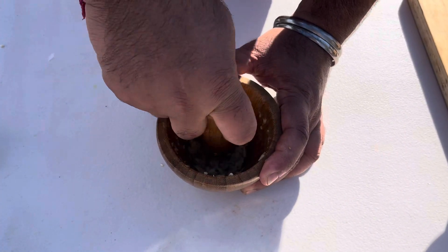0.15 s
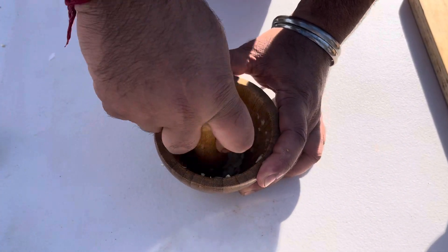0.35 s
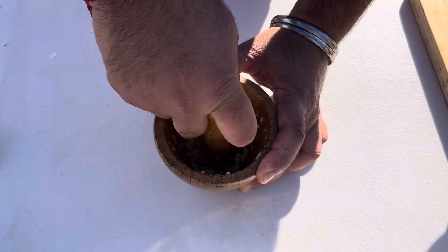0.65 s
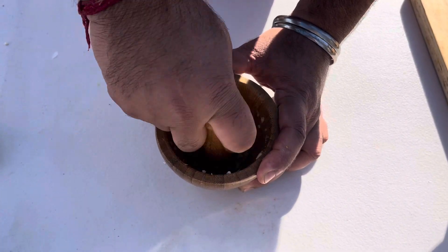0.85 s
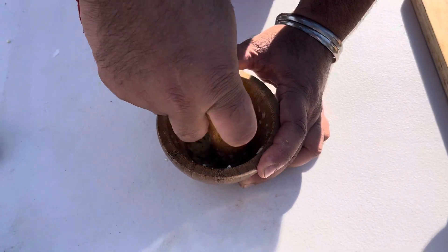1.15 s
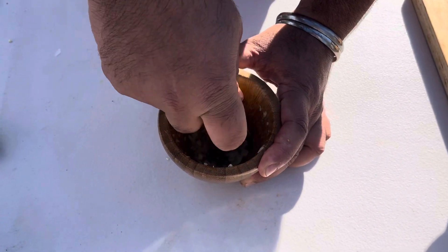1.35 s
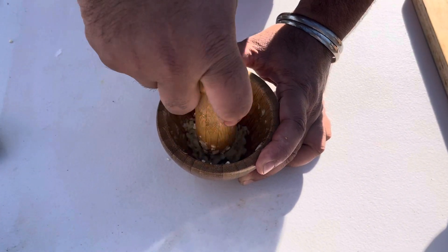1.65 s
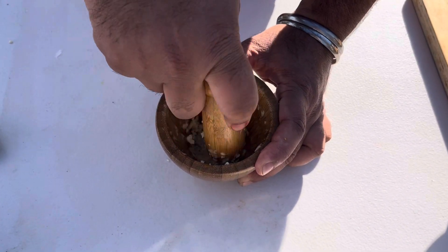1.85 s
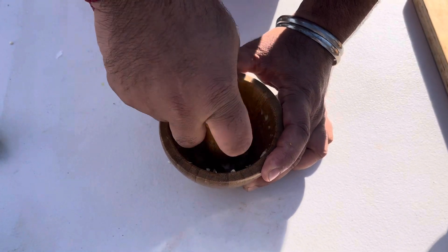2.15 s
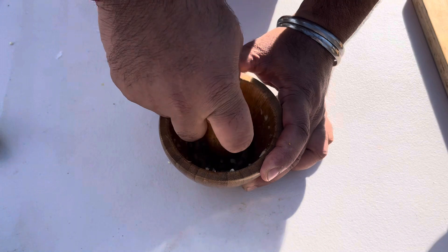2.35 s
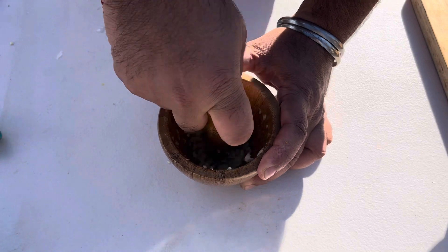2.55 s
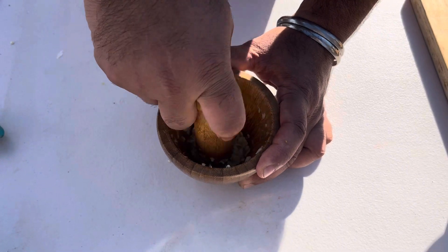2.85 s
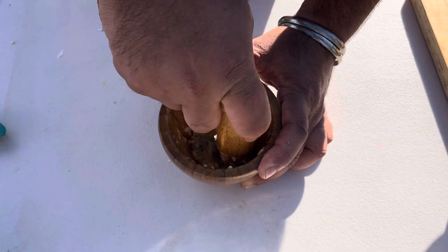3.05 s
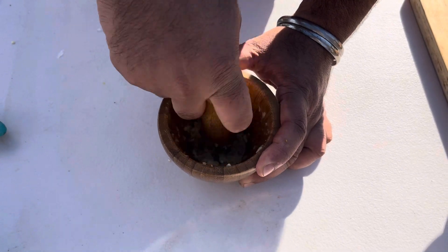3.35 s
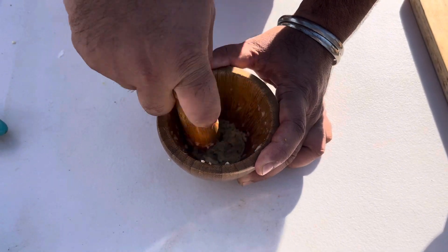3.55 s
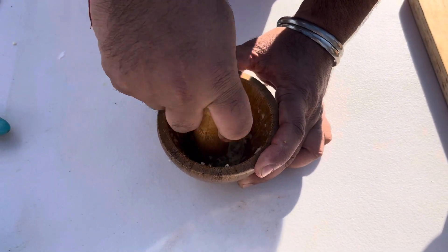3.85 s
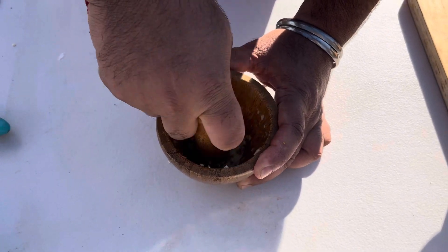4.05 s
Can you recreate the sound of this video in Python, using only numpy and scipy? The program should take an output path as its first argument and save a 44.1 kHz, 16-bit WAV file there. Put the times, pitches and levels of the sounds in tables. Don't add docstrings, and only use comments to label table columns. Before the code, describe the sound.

Close, regular pestle strokes thump and crunch in a wooden bowl, shaking the table top, with light rim knocks and faint bangle clinks.

```python
import sys
import numpy as np
from scipy import signal
from scipy.fft import rfft, irfft, next_fast_len
from scipy.io import wavfile
from scipy.ndimage import uniform_filter1d

SR = 44100
rng = np.random.default_rng(int(sys.argv[2]) if len(sys.argv) > 2 else 0)


def transcribe(signal):
    frames = np.atleast_2d(signal).T
    limited = np.clip(frames, -1, 1)
    pcm = np.round(limited * 32767).astype(np.int16)
    wavfile.write(sys.argv[1], SR, pcm)


def linear_from_db(decibels):
    return 10 ** (np.asarray(decibels, float) / 20)


N = 185423
WIDE = next_fast_len(N)
BINS = np.fft.rfftfreq(WIDE, 1 / SR)


def evened(x):
    return x / np.sqrt(np.mean(x ** 2) + 1e-20)


def read(points, hz):
    f, value = np.transpose(points)
    return np.interp(np.log(hz + 1), np.log(f + 1), value)


def add(mix, s, sound):
    part = mix[max(round(s * SR), 0):][:len(sound)]
    part += sound[:len(part)]


def filtered(x, gain):
    return irfft(rfft(x, WIDE) * gain, WIDE)[..., :N]


def colour(x, points):
    return evened(filtered(x, linear_from_db(read(points, BINS))))


def band(x, lo_hz, hi_hz):
    sos = signal.butter(2, [lo_hz, min(hi_hz, 20000)], "band", fs=SR, output="sos")
    return signal.sosfilt(sos, x)


def resonate(x, hz, width):
    r = np.exp(-np.pi * width / SR)
    return 2 * signal.lfilter([1 - r], [1, -r * np.exp(2j * np.pi * hz / SR)], x).real


def wander(x, hz, width):
    turn = np.exp(2j * np.pi * np.cumsum(hz) / SR)
    r = np.exp(-np.pi * width / SR)
    return 2 * (turn * signal.lfilter([1 - r], [1, -r], x / turn + 1e-18)).real


def patchy(x, patch_db, size=11):
    z = signal.stft(x, nperseg=128, noverlap=96)[2]
    patches = uniform_filter1d(rng.standard_normal(z.shape[::-1]), size, axis=0)
    patches = uniform_filter1d(patches, 4, axis=1)
    return signal.istft(z * linear_from_db(patch_db * evened(patches).T), nperseg=128, noverlap=96)[1][:N]


# pitch_hz, density_db
AIR_COLOUR = [(30, 6.5), (60, 3.5), (150, -6), (280, -22), (600, -33), (1300, -33.5), (2200, -41.5),
              (8000, -48.5)]
# pitch_hz, level_db
AIR_APART = [(110, -8), (250, -4.5), (700, 1), (1700, 6), (3000, -5), (9600, -1), (10600, -25)]
# pitch_hz, level_db
FAR_MACHINE = (1270, -69)


def air():
    a, b = (colour(v, AIR_COLOUR) for v in rng.standard_normal((2, N)))
    apart = filtered(b, linear_from_db(read(AIR_APART, BINS)))
    hz, db = FAR_MACHINE
    tone = linear_from_db(db + 5.5) * np.sin(2 * np.pi * hz * np.arange(N) / SR)
    return linear_from_db(-34.5) * np.array([a + apart, a - apart]) + tone


# start_s, grind_db, table_db, pressed_s
STROKES = [(-0.07, -15, -23, 0.068), (0.1287, -24.5, -21.5, 0.13), (0.319, -33, -27.5, 0.11),
           (0.8857, -26, -25, 0.12), (1.0956, -24.5, -23, 0.0914), (1.3096, -27.5, -23, 0.1),
           (1.5207, -25, -23, 0.09), (1.7335, -27.5, -23.5, 0.11), (1.936, -23, -19, 0.11),
           (2.154, -21, -18.5, 0.1168), (2.36, -16.5, -18.5, 0.13), (2.569, -22, -18.5, 0.128),
           (2.7876, -23, -19.5, 0.154), (2.989, -16, -16.5, 0.078), (3.1883, -19.5, -20, 0.093),
           (3.3941, -22, -19, 0.18), (3.604, -30, -23.5, 0.075), (3.8084, -18.5, -17, 0.0757),
           (4.0154, -20, -16.5, 0.12)]


def strokes(column, pressed_db_per_s, lifted_db_per_s, left_db, settle_db_per_s):
    t, power = np.arange(N) / SR, 0
    for row in STROKES:
        age = t - row[0]
        lifted = np.maximum(age - row[3], 0)
        db = row[column] - pressed_db_per_s * age - lifted_db_per_s * lifted
        settle_db = left_db - settle_db_per_s * age
        both = linear_from_db(2 * np.minimum(db, 0)) + linear_from_db(2 * np.minimum(settle_db, 0))
        power = power + both * np.clip(age / 0.0014, 0, 1) ** 2
    return np.sqrt(power)


# pitch_hz, density_db
TOP_COLOUR = [(30, -35.5), (50, 0.5), (110, 1), (190, 2), (320, -5), (520, -20.5), (900, -17.5),
              (1500, -57.5)]
# pitch_hz, width_hz, level_db
PLANKS = [(105.4, 22, 4.5), (175, 43.7, -4.5), (261, 53, 0), (304.35, 4.4, -8), (402.7, 35, -4),
          (533.5, 24, -3.5), (643.6, 145.5, -6), (1057, 28, -10.5)]


def shake():
    jolts = colour(rng.standard_normal(N), TOP_COLOUR)
    modes = evened(sum(linear_from_db(db) * evened(resonate(jolts, hz, width)) for hz, width, db in PLANKS))
    level = strokes(column=2, pressed_db_per_s=139.5, lifted_db_per_s=100.5,
                    left_db=-46.0, settle_db_per_s=59.5)
    return level * (linear_from_db(-3.0) * jolts + linear_from_db(1.7) * modes)


# start_s, peak_db, brightness_db, t60_s
TOUCHES = [(0.112, -19.5, 2, 0.034), (0.3002, -23.5, 2.5, 0.035), (0.8657, -17, -2, 0.031),
           (1.072, -25, 0.5, 0.04), (1.286, -20, 0.5, 0.033), (1.4895, -24, -8, 0.0174),
           (1.5047, -20, 2, 0.0397), (1.7, -40, 3.5, 0.019), (1.7155, -19, 4, 0.022),
           (1.914, -17.5, -4.5, 0.0306), (2.125, -19, -1, 0.0375), (2.3407, -9.5, -0.5, 0.0178),
           (2.55, -17.5, -2, 0.042), (2.769, -17, 2.5, 0.0234), (2.9687, -16.5, 0.5, 0.0394),
           (3.168, -20.5, 2.5, 0.036), (3.375, -16.5, -0.5, 0.041), (3.571, -21, -3, 0.038),
           (3.5868, -21.5, 1, 0.021), (3.785, -20, -0.5, 0.0346), (3.9913, -23, -0.5, 0.048)]
# start_s, peak_db, brightness_db, t60_s
CRUSHES = [(0.1303, -11.5, -4.5, 0.024), (0.318, -14.5, -1, 0.032), (0.8854, -5, 0.5, 0.032),
           (1.092, -14.5, -2, 0.032), (1.308, -4, 2, 0.019), (1.5242, -7.5, -0.5, 0.023),
           (1.7345, -11, -6, 0.026), (1.935, -4.5, 1, 0.0476), (2.148, -2.5, 0, 0.02),
           (2.364, -8, -2.5, 0.02), (2.574, -1.5, -1, 0.026), (2.7888, -8.5, -2.5, 0.054),
           (2.9897, -1, 1.5, 0.016), (3.1878, -2.5, 0.5, 0.022), (3.3969, -3.5, -2, 0.025),
           (3.6064, -8, 1, 0.0201), (3.8045, -4.5, -2, 0.0233), (4.014, -3.5, 0, 0.031)]
# start_s, peak_db, brightness_db
REBOUNDS = [(0.152, -18, -2.5), (0.333, -16, -1.5), (0.919, -23, 7.5), (1.1145, -32, -7), (1.343, -23, 4),
            (1.5444, -39, -3), (1.765, -24, 1), (1.961, -10, -2.5), (2.186, -14.5, -0.5), (2.387, -13, -12),
            (2.6116, -28.5, 14), (2.8108, -11, 1), (3.02, -4.5, -1), (3.226, -28.5, 17), (3.4364, -39, 5.5),
            (3.6417, -33, 16), (3.835, -6, -2.5), (4.035, -10, -2)]
# start_s, peak_db, brightness_db, t60_s
TWISTS = [(0.192, -15.5, -1, 0.019), (0.9595, -24, -1, 0.0173), (0.976, -35.5, 10, 0.057),
          (1.1551, -15.5, 4, 0.021), (1.368, -18.5, -6.5, 0.056), (1.382, -22.5, 6, 0.032),
          (1.407, -26, 8.5, 0.034), (1.5911, -19.5, 1, 0.0403), (1.7975, -12, 0, 0.0247),
          (2.018, -24, 5, 0.0814), (2.209, -11.5, 3, 0.038), (2.218, -15, -1, 0.0244),
          (2.238, -26, 8, 0.03), (2.262, -37.5, 9, 0.0503), (2.351, -20.5, -4, 0.037),
          (2.404, -14, 0.5, 0.0434), (2.4234, -16.5, 4, 0.03), (2.4973, -32, 8, 0.0313),
          (2.633, -22, 4.5, 0.093), (2.6644, -18, 6, 0.047), (2.865, -19.5, 10.5, 0.021),
          (2.8788, -21, 4, 0.04), (3.047, -33.5, -5, 0.05), (3.064, -37.5, 4, 0.042),
          (3.438, -25.5, 15, 0.0144), (3.459, -15, -3.5, 0.054), (3.496, -21.5, 4.5, 0.021),
          (3.507, -24, 5.5, 0.058), (3.595, -30, -5.5, 0.018), (3.665, -24.5, 7.5, 0.0234),
          (3.689, -24, 4.5, 0.058), (3.887, -22, 8, 0.012), (3.9075, -27, 0.5, 0.023),
          (3.918, -27, 4.5, 0.038), (4.1092, -24.5, 8.5, 0.029)]
# start_s, peak_db, t60_s
CRUMBS = [(0.2785, -39.5, .07), (0.399, -44, .02), (0.4381, -37, 0.066), (0.4863, -41.5, 0.033),
          (0.505, -46, 0.067), (0.53, -39.5, 0.038), (0.595, -50, 0.031), (0.612, -51, .03),
          (0.6371, -38.5, 0.047), (0.65, -39.5, 0.042), (0.689, -46.5, 0.091), (0.743, -58.5, .03),
          (1.2094, -54, .07)]
# thud_db, wood_db, fizz_db
TOUCH_TONE = (-4.5, -15, 1.6)
CRUSH_TONE = (-4.5, -16.5, -2.5)
REBOUND_TONE = (-8.5, -35.5, -1.5)
TWIST_TONE = (-13, -11, -3.5)
CRUMB_TONE = (-18.5, -13, 0)
TOUCH_SPAN = (0.6, 1.9, 1.1, 0.55)


def bursts(abrupt):
    out, t = np.zeros((4, N)), np.arange(4000) / SR
    touch_rise_s, crush_rise_s, small_rise_s = 0.0038, 0.0024, 0.00069
    rebound_t60_s = 0.02824
    rows = [(*r, TOUCH_TONE, TOUCH_SPAN, touch_rise_s) for r in TOUCHES]
    rows += [(*r, CRUSH_TONE, 1, crush_rise_s) for r in CRUSHES]
    rows += [(*r, rebound_t60_s, REBOUND_TONE, 1, crush_rise_s) for r in REBOUNDS]
    rows += [(*r, TWIST_TONE, 1, small_rise_s) for r in TWISTS]
    rows += [(s, db, 0, t60, CRUMB_TONE, 1, small_rise_s) for s, db, t60 in CRUMBS]
    for s, db, bright_db, t60, (thud_db, wood_db, fizz_db), span, rise in rows:
        lengths = np.maximum(t60 * np.multiply(span, np.ones(4)), .005)[:, None]
        shapes = (1 - np.exp(-t / rise)) ** 2 * linear_from_db(-120 * (t / lengths) ** abrupt)
        extras = (0, thud_db - bright_db, wood_db - bright_db / 2, fizz_db + bright_db)
        for row, shape, extra_db in zip(out, shapes, extras):
            add(row, s - .001, linear_from_db(2 * (db + extra_db - 8.5)) * shape / shape.max())
    return out


# pitch_hz, density_db
GRIT = [(880, -79), (1500, -12), (2130, -1), (2840, 1.5), (3580, -2), (4200, -3.5), (4690, -2),
        (5500, -4.5), (6390, -7), (7800, 3), (11600, -11.5), (13800, -7), (16400, 7.5)]
# pitch_hz, width_hz, level_db
RATTLE = [(2879, 24, 2.5), (3905, 13, 4.5), (4204.6, 122, 2), (5430, 330, -2), (6975, 55, 2.5),
          (7630, 26.5, -11), (8070, 100, -2), (8870, 600, 2.5), (9620, 350, 3), (11580, 78, -5.5),
          (11320, 214, 0), (11640, 114, -1), (13330, 92, -1)]


def crunch(envelopes, grip):
    sizes = linear_from_db(2.536 * np.minimum(rng.exponential(1, N), 4))
    cracks = rng.standard_normal(N) * sizes * (rng.random(N) < 6000 / SR)
    grit = patchy(patchy(colour(cracks, GRIT), patch_db=3.0), patch_db=1.0, size=70)
    main, thud, wood, fizz, grind = envelopes
    mid = evened(band(grit, 2750, 7270)) * np.sqrt(main + linear_from_db(-3.5) * grind)
    top = evened(band(grit, 8900, 15040)) * np.sqrt(fizz + linear_from_db(1.0) * grind ** 1.141)
    low = evened(band(cracks, 775, 2354)) * np.sqrt(wood + linear_from_db(-17.0) * grind)
    dull = evened(band(cracks, 236, 1107.0)) * np.sqrt(thud)
    rung = 0
    for k, (hz, width, db) in enumerate(RATTLE):
        g = np.roll(grip, 9000 * k)
        rung = rung + linear_from_db(db + 5 * g[::-1]) * wander(mid + top, hz * (1 + .012 * g), width)
    return linear_from_db(-4.0) * (mid + top) + linear_from_db(-3.0) * rung + low + dull


def bends(rows, glide, rise, fall, late):
    out, u = np.zeros(N), np.arange(-1323, 2205) / SR
    for s, db, hz in rows:
        turns = hz * (np.sqrt(1 + 2 * glide * np.maximum(u, -.4 / glide)) - 1) / glide
        swell = np.exp(-((u - late) / np.where(u < late, rise, fall)) ** 2)
        add(out, s + u[0], -linear_from_db(db) * swell * np.cos(2 * np.pi * turns))
    return out


# start_s, depth_db, pitch_hz
PUSHES = [(0.1289, -10.5, 137.3), (0.3161, -11, 135.2), (0.8792, -2.5, 123), (1.0874, -17.5, 117),
          (1.3024, -8, 108), (1.5006, -14.5, 143), (1.716, -15, 138), (1.9312, -3, 123),
          (2.1418, -6.5, 108.4), (2.3549, -1, 133.2), (2.5666, -12, 127), (2.787, -12, 136),
          (2.9843, -1.5, 119), (3.1833, -8.5, 116), (3.3836, -16, 132.4), (3.5849, -16.5, 130.4),
          (3.8021, -7, 122.5), (4.0101, -8.5, 113)]
# start_s, depth_db, pitch_hz
SLAMS = [(0.1431, -4.5, 69.8), (0.3308, -5.5, 75), (0.8949, -4, 60), (1.1049, -8, 63.5), (1.3188, -4.5, 67),
         (1.536, -6.5, 77.4), (1.7474, -6.5, 69.8), (1.946, -3, 70.4), (2.1577, -6.5, 62),
         (2.3687, -5.5, 67.2), (2.5833, -3.5, 62), (2.8019, -3.5, 65), (2.9991, -7.5, 70.6),
         (3.1988, -4, 69.5), (3.4082, -4, 72.2), (3.6189, -9.5, 70.5), (3.8178, -3.5, 72.2),
         (4.0252, -4.5, 68.6)]
# start_s, depth_db, pitch_hz
SHUDDERS = [(2.398, -15, 167), (2.449, -15, 180.6), (3.042, -16.5, 156.6), (1.387, -25, 199),
            (1.407, -23, 207), (3.482, -18, 178.3), (2.35, -17, 331), (2.384, -20, 668.5),
            (2.395, -16, 334.6), (2.412, -20.5, 684), (2.432, -26, 673)]


def dips():
    pushes = bends(PUSHES, glide=51.1, rise=0.0098, fall=0.017, late=0.0032)
    stiffer = np.multiply(SLAMS, [1, 1, 1.15])
    slams = bends(stiffer, glide=1.1, rise=0.007, fall=0.0084, late=0.0014)
    shudders = bends(SHUDDERS, glide=3.2, rise=0.00734, fall=0.0094, late=0)
    return pushes + linear_from_db(4.0) * slams + shudders


def rings(rows, gain_db, tail):
    out, u = np.zeros(N), np.arange(-2205, 4410) / SR
    for (s, db, hz, half), phase in zip(rows, rng.random(len(rows))):
        swell = np.exp(-(u / np.where(u < 0, half, tail * half)) ** 2)
        note = np.sin(2 * np.pi * (hz * u + phase))
        neighbour = 0.63 * np.sin(2 * np.pi * (1.04 * hz * u + 3 * phase))
        add(out, s + u[0], linear_from_db(db + gain_db) * swell * (note + neighbour))
    return out


# start_s, level_db, pitch_hz, half_length_s
THUNKS = [(0.1509, -40.5, 1001, 0.0204), (0.3236, -24.5, 921, 0.0068), (0.8809, -43, 1012, 0.0099),
          (0.9027, -32.5, 735, 0.016), (1.0971, -26, 758, 0.0067), (1.5151, -18.5, 290.5, 0.011),
          (1.5267, -25, 799, 0.0068), (1.5325, -35, 1070, 0.0089), (1.7502, -25, 538.8, 0.017),
          (1.9432, -19, 1110, 0.0072), (1.949, -35, 672, 0.015), (2.2146, -29, 600.0, 0.013),
          (2.3467, -29, 1149, 0.009), (2.3757, -36, 1090, 0.024), (2.6616, -37, 586.5, 0.0117),
          (2.9025, -30, 524, 0.0092), (2.9954, -14, 1038, 0.0035), (3.0288, -40, 606, 0.028),
          (3.0723, -27, 997, 0.006), (3.2, -23, 600, 0.017), (3.2566, -41, 540, 0.026),
          (3.274, -32.5, 1016, 0.02), (3.3756, -25, 1010, 0.0037), (3.4017, -24, 560, 0.0056),
          (3.422, -37, 664, 0.031), (3.4598, -36, 834, 0.023), (3.483, -31, 980, 0.012),
          (3.6122, -25, 1093, 0.01), (3.8095, -19.5, 815, 0.0048), (4.0504, -40, 950, 0.0077)]


def thunks():
    return rings(THUNKS, gain_db=-2.5, tail=1.4)


# start_s, level_db, pitch_hz, half_length_s
PINGS = [(0.217, -39.5, 4120, 0.0054), (0.3352, -38.5, 12000, 0.0033), (0.372, -49, 3500, 0.004),
         (0.4, -48.5, 4340, 0.004), (0.415, -50.5, 4300, 0.0032), (0.612, -65, 4360, 0.004),
         (0.743, -66, 4150, 0.004), (1.1579, -31.5, 4100, 0.003), (1.1883, -43.5, 11650.0, 0.004),
         (1.311, -25, 5434, 0.00227), (1.312, -23.5, 2760, 0.00236), (1.3145, -15.5, 7890, 0.0028),
         (1.753, -32, 2880, 0.0047), (1.8019, -35.5, 8150, 0.0024), (1.8069, -48.5, 12120, 0.0099),
         (1.9501, -29.5, 7850, 0.0029), (1.989, -44, 11020.0, 0.0038), (2.1531, -22, 4190, 0.00452),
         (2.1541, -19.5, 7870, 0.00304), (2.1561, -29.5, 7160, 0.0028), (2.216, -37, 4127, 0.0096),
         (2.2224, -31, 8000, 0.0028), (2.3691, -20.5, 3894, 0.0022), (2.3721, -26, 5470, 0.0028),
         (2.3876, -25.5, 3800, 0.0081), (2.411, -27, 7440, 0.0039), (2.44, -35.5, 4950.0, 0.0039),
         (2.4589, -31.5, 3165, 0.0173), (2.5796, -24.5, 5520, 0.0029), (2.5891, -37, 8000, 0.0196),
         (2.5991, -43, 2860, 0.003), (2.6111, -32, 3850, 0.0047), (2.9967, -25, 2900, 0.0094),
         (2.9967, -22, 4094, 0.0043), (3.0221, -24.0, 11270, 0.0034), (3.0256, -21, 5640, 0.003),
         (3.0261, -23, 7980, 0.0035), (3.0321, -27.5, 12030.0, 0.0059), (3.1947, -19.5, 7970, 0.0035),
         (3.2162, -31.5, 7900, 0.0029), (3.4247, -31, 2870, 0.0045), (3.6093, -34.5, 2813, 0.005),
         (3.8353, -27.5, 4250, 0.01), (4.0199, -20, 5430, 0.0039), (4.0224, -23, 7880, 0.0098),
         (4.0293, -29, 4300, 0.0142), (4.0952, -35, 10230, 0.00315)]


def pings():
    return rings(PINGS, gain_db=5.5, tail=0.86)


# start_s, peak_db, pitch_hz, t60_s, crack_db
KNOCKS = [(0.2495, -44, 1352, 0.014, -19), (0.964, -35, 1400, 0.0137, 4.5), (1.489, -21.5, 1290, 0.028, 10),
          (1.7032, -27, 1286, 0.021, 7.5), (2.0645, -27.5, 1374, 0.012, -4.5),
          (2.277, -30.5, 1350, 0.015, -19), (2.3433, -34, 1080, 0.041, -12.5),
          (2.902, -25, 1344, 0.013, -17.5), (3.0659, -26, 1457, 0.021, 3),
          (3.2881, -28.5, 1440, 0.00426, 9), (3.3726, -22, 1316, 0.012, 10), (3.573, -21, 1340, 0.016, 16),
          (3.922, -33, 1326, 0.0211, -9), (4.137, -42, 1386, 0.02, -12.5)]
# pitch_ratio, level_db
BOWL = [(1, 21), (1.22, 18), (1.5, 10), (1.9, 0), (2.45, 3)]


def rim():
    out, t = np.zeros(N), np.arange(3000) / SR
    cracks = band(rng.standard_normal((len(KNOCKS), 3000)), 1150, 3450)
    phases = rng.random((len(KNOCKS), len(BOWL)))
    rise = 1 - np.exp(-(t / .0005) ** 2)
    for (s, db, hz, t60, crack_db), crack, phase in zip(KNOCKS, cracks, phases):
        hollow = sum(linear_from_db(d) * np.sin(2 * np.pi * (k * hz * t + 0.44 * p)) for (k, d), p in zip(BOWL, phase))
        knock = linear_from_db(db - 9.5 - 60 * t / t60) * (hollow + linear_from_db(12.0 + crack_db) * crack) * rise
        add(out, s, knock)
        add(out, s + 0.00355, linear_from_db(-8) * knock)
    return out


# time_s, level_db
ROCKING = [
    (0.4, -43.5),
    (0.41, -32.5),
    (0.578, -30.5),
    (0.82, -51),
]


def rocking():
    s, db = np.transpose(ROCKING)
    hum = resonate(resonate(rng.standard_normal(N), 98.0, 77), 106.0, 74.4)
    level = linear_from_db(np.interp(np.arange(N) / SR, s, db - 2.5, -120, -120))
    return uniform_filter1d(level, size=1500) * evened(hum)


# start_s, level_db, t60_s
CLINKS = [
    (2.39, -39, .2),
    (2.446, -29, .33),
    (2.62, -37, .35),
    (2.68, -35, .25),
    (2.87, -47, .25),
    (3.06, -36, .3),
    (3.685, -41, .3),
    (3.89, -36, .5),
    (4.06, -43, .2),
]
# pitch_hz, level_db
BANGLE = [(1720, -7), (3162, 2), (4210, -11), (4958, -7), (8780, -13), (11100, -9)]


def bangles():
    out, t = np.zeros(N), np.arange(20000) / SR
    for s, db, t60 in CLINKS:
        for hz, mode_db in BANGLE:
            fade = linear_from_db(db + mode_db - 60 * t / t60 * (hz / 3162) ** 1.1)
            ring = fade * np.sin(2 * np.pi * hz * t)
            ring *= 1 + 0.1 * np.cos(2 * np.pi * 0.0056 * hz * t)
            add(out, s, ring * (1 - np.exp(-t / 0.00096)))
    return out


# pitch_hz, lead_rad
LEAD = [(0, 0), (1810, 3.5), (3190, 8), (4130, 7.5), (4820, 3), (5500, 4.5), (6290, 5), (7490, 2.5),
        (7920, 5), (8400, 2.15), (9740, 1.58),
        (10500, .15), (12800, -.1), (13600, -1.5), (14200, -2.95), (16100, -3.1)]
# pitch_hz, level_db
TILT = [(60, 3), (150, 0.8), (380, 1.5), (950, 6), (2380, 0.5), (5980, 0), (10500, -3.8), (15000, 2.5)]
# pitch_hz, likeness_ratio
ALIKE = [(60, 0.97), (250, 0.94), (1000, 0.672), (4000, 0.362), (8000, 0.46),
         (9900, .6), (10600, .96), (12800, .97), (13500, .85), (14200, .95)]


def ports(solid, near, stray):
    same = np.clip(read(ALIKE, BINS), 0, .99)
    f, lead = np.transpose(LEAD)
    tilt = linear_from_db(read(TILT, BINS) / 2)
    later = np.exp(-1j * np.interp(BINS, f, lead))
    right = solid + filtered(near, same) + filtered(stray, np.sqrt(1 - same ** 2))
    return np.array([filtered(solid + near, tilt), filtered(right, later / tilt)])


# pitch_hz, level_db
RIM_SHADE = [(1700, -14), (2300, -3)]


def scene():
    clumps = linear_from_db(1.1 * evened(uniform_filter1d(rng.standard_normal(N), 250)))
    grind = clumps * strokes(column=1, pressed_db_per_s=141.0, lifted_db_per_s=330,
                             left_db=-35.5, settle_db_per_s=111)
    envelopes = *bursts(abrupt=2.21), grind ** 2
    grip = evened(uniform_filter1d(uniform_filter1d(rng.standard_normal(N), size=3000), size=3000))
    near, stray = (shake() + linear_from_db(2.0) * crunch(envelopes, grip) for spot in range(2))
    solid = dips() + bangles() + rocking() + pings() + thunks()
    knocks, lag = rim(), 17
    around = np.roll(knocks, lag) + .7 * np.roll(knocks, 9 * lag)
    shaded = filtered(around, linear_from_db(read(RIM_SHADE, BINS)))
    return ports(solid, near, stray) + linear_from_db(6.0) * np.array([knocks, shaded]) + air()


def gate(x, knee_db, deepest_db):
    hz, t, z = signal.stft(x, SR, nperseg=256, noverlap=192)
    power = uniform_filter1d(uniform_filter1d((abs(z) ** 2).mean(0), 5, axis=0), 3, axis=1)
    level_db = 10 * np.log10(abs(power) + 1e-20)
    sink_db = np.clip(level_db - knee_db, deepest_db, 0) * (hz > 1600)[:, None]
    return signal.istft(z * linear_from_db(sink_db), SR, nperseg=256, noverlap=192)[1][:, :N]


def thin_stereo(x, margin_db, waver_db, attack_db):
    pair = np.array([[1, 0.98], [1, -1]])
    z = signal.stft(pair @ x / 2, nperseg=1024, noverlap=512)[2][:, :512]
    power = uniform_filter1d((abs(z) ** 2).reshape(2, 64, 8, -1).mean(2), size=3, axis=2)
    level_db = 10 * np.log10(abs(power) + 1e-20)
    treble_db = 10 * np.log10((abs(z[:, 40:]) ** 2).mean((0, 1)) + 1e-20)
    steady = np.diff(treble_db, prepend=0) < attack_db
    count = len(steady)
    whole = np.repeat(rng.standard_normal(count), 2)[:count]
    each = np.repeat(rng.standard_normal((count, 64)), 2, axis=0)[:count].T
    bands = np.arange(64)[:, None]
    margin = margin_db + waver_db * (whole + each) + 3 * (bands < 29)
    dropped = (level_db[::-1] - level_db > margin) & steady & (bands >= 4)
    kept = np.pad(z * ~np.repeat(dropped, 8, axis=1), ((0, 0), (0, 1), (0, 0)))
    return pair @ signal.istft(kept, nperseg=1024, noverlap=512)[1][:, :N]


def band_limit(x):
    return signal.sosfilt(signal.butter(12, 16500, fs=SR, output="sos"), x)


# pitch_hz, level_db
MIC = [(25, -25), (40, -4), (62, -0.5), (20000, 0)]
# pitch_hz, level_db
EDGE = [(12800, 0), (13500, -4), (14300, -5.5), (15200, -9), (15750, -15), (15950, -38), (16500, -50),
        (16900, -75)]


def record(dry):
    heard = gate(filtered(dry, linear_from_db(read(MIC, BINS))), knee_db=-78, deepest_db=-14)
    limited = .92 * heard / (1 + heard ** 4) ** .25
    edged = filtered(limited, linear_from_db(read(EDGE, BINS)))
    mix = thin_stereo(edged, margin_db=7.5, waver_db=2.5, attack_db=8)
    return band_limit(mix)


dry = scene()
out = record(dry)
transcribe(out)
```